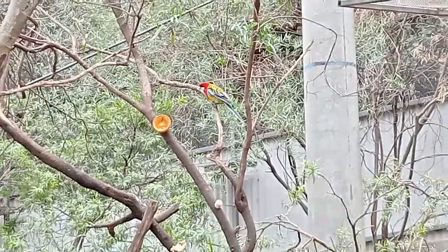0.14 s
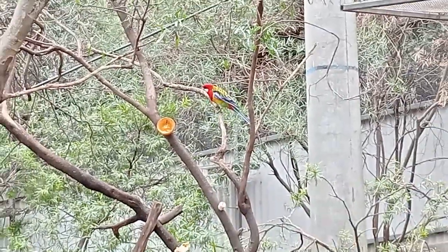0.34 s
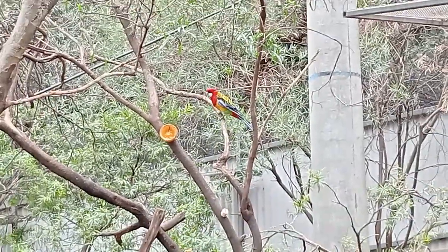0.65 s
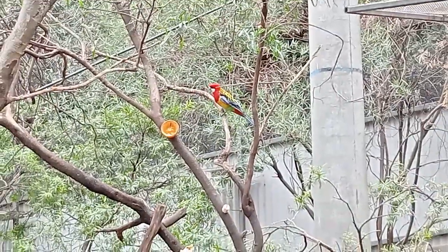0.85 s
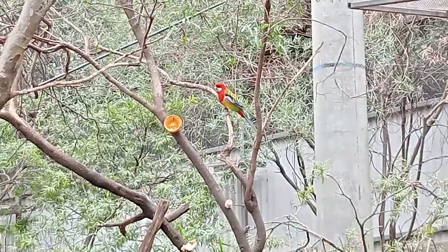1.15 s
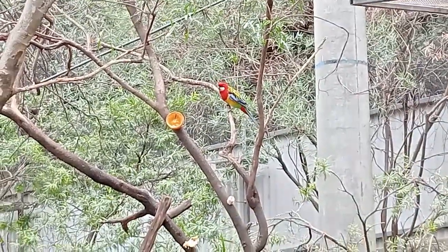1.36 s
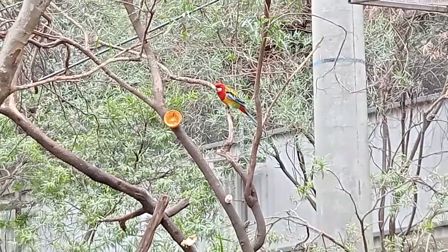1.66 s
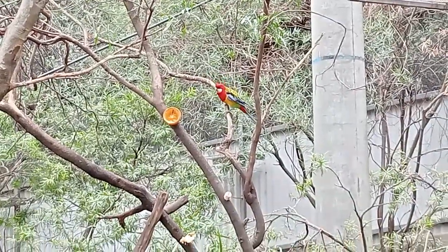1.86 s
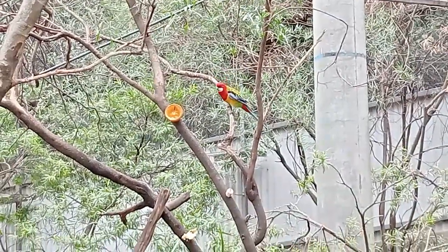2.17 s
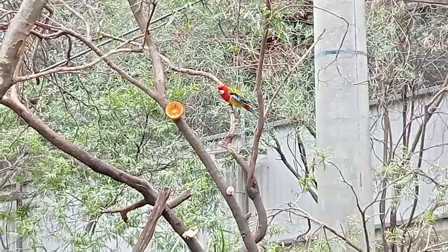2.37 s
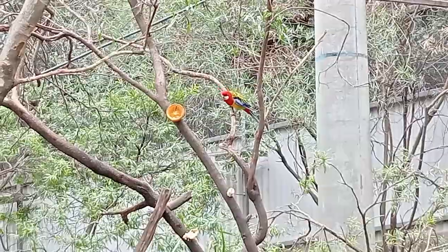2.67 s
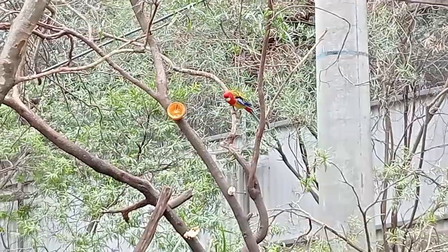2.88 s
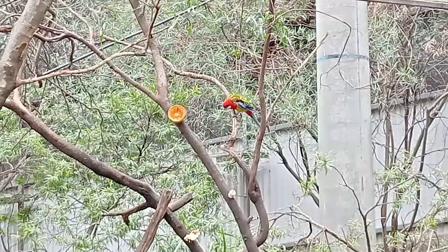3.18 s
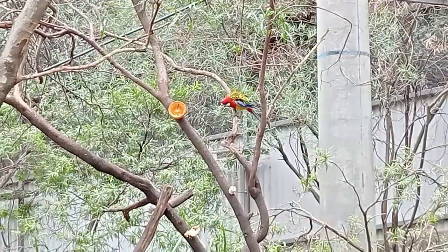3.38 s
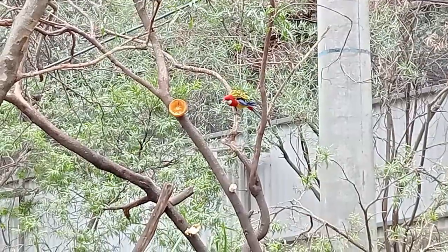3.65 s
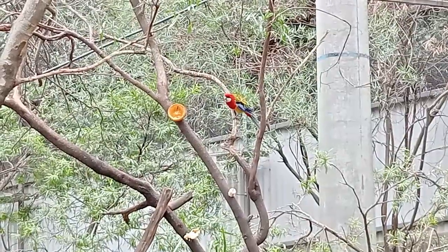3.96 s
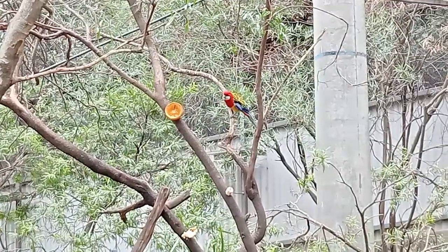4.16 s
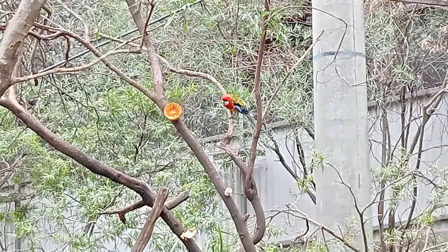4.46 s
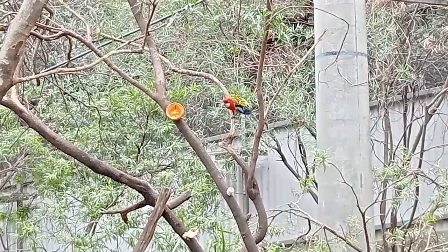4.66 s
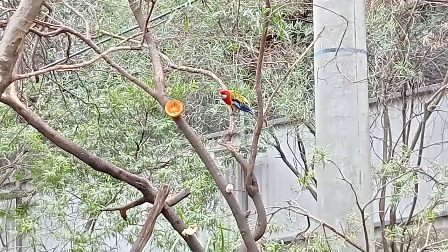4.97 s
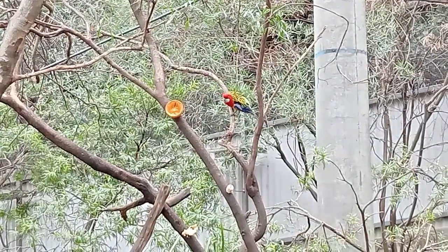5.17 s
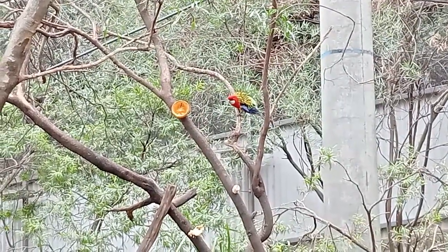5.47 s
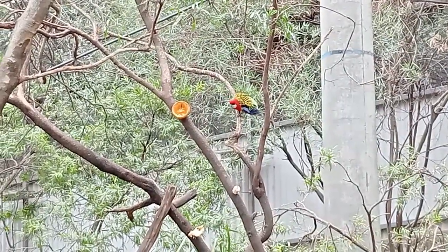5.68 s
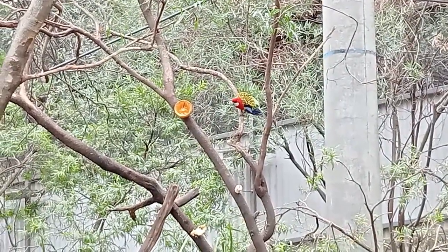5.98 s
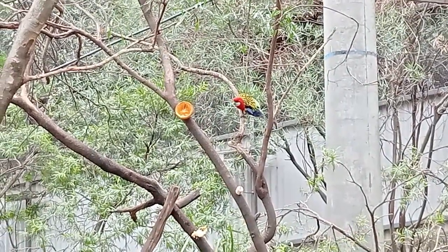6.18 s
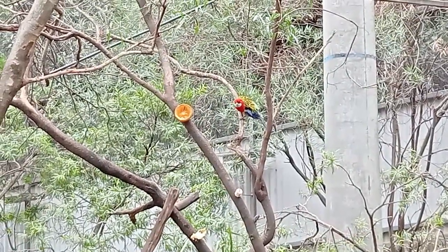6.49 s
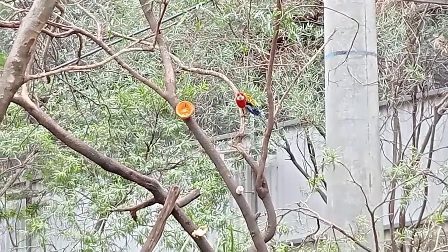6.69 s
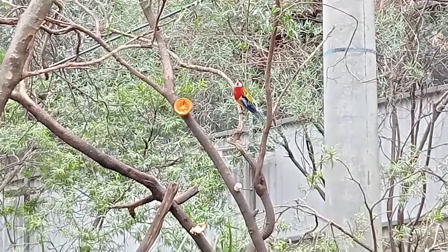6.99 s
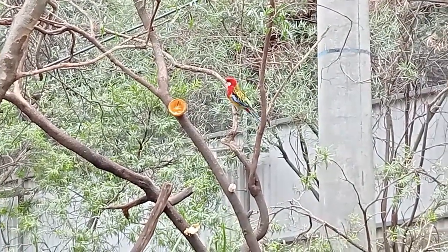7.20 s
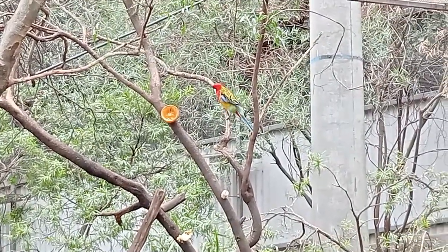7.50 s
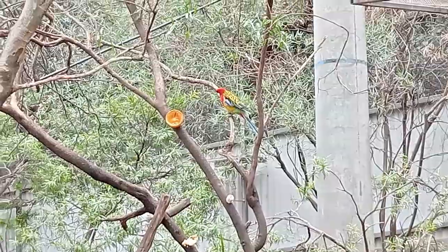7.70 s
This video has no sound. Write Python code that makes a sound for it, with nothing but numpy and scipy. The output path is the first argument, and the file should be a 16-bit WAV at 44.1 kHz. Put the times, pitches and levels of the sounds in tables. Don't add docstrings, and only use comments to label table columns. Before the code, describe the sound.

In a leafy outdoor aviary, a faint bump and the dying tail of a squawk open over soft leaf hiss and distant traffic hum. A close parrot gives smooth, hollow whoops, each climbing and briefly sagging, near 0.2, 0.7 and 1.3 seconds. It then rests: a dove yelps softly at 1.8, low fluttering coos roll from 2.1 to 2.6, and a sharp twig tick snaps at 2.15. Around 2.7 to 3.5 distant finches crowd in with thin whistles, screeches and rasps, and one loud rattling squawk at 3.0. Whoops return at 3.5 and repeat about every 0.6 seconds until 7.6. Between them come a hoot at 3.9, rolled coos at 4.1, 5.1 and 6.3, a yelp at 5.95 and another hoot at 7.55. Faint insect buzzing pulses near 1.5 and 5.3 to 6. Small ticks, rustles and chirps continue, ending on a soft high rolled coo.

```python
import sys
import numpy as np
from scipy import signal
from scipy.fft import rfft, irfft, next_fast_len
from scipy.io import wavfile
from scipy.ndimage import uniform_filter1d, map_coordinates

SR = 44100
rng = np.random.default_rng(int(sys.argv[2]) if len(sys.argv) > 2 else 0)


def decibels_to_gain(level_db):
    exponent = np.asarray(level_db, float) / 20
    return 10 ** exponent


def transcribe(u):
    v = np.clip(np.atleast_2d(u).T, -1, 1)
    q = np.round(v * 32767).astype(np.int16)
    wavfile.write(sys.argv[1], SR, q)


N = 345744
TIME = np.arange(N) / SR
FINCH_OCTAVE_DB = -20.5


def unit(x):
    return x / np.sqrt(np.mean(x ** 2) + 1e-20)


def along(points, hz):
    f, v = np.transpose(points)
    return np.interp(np.log(hz + 1), np.log(f + 1), v)


def coloured(x, response):
    m = next_fast_len(len(x) + 4096)
    spectrum = rfft(x, m) * response(np.fft.rfftfreq(m, 1 / SR))
    return irfft(spectrum, m)[:len(x)]


def wobble(n, rate):
    knots = rng.standard_normal(int(n * rate / SR) + 4)
    return map_coordinates(knots, [np.arange(n) * rate / SR])


def window(n, rise, fall):
    t = np.arange(n) / SR
    opening = np.minimum(t / rise, t[::-1] / fall)
    return np.sin(np.pi / 2 * np.clip(opening, 0, 1)) ** 2


def add(out, s, x):
    i = round(max(s, 0) * SR)
    out[i:i + len(x)] += x[:N - i]


def read(rows):
    s, *cols = np.transpose(rows)
    t = np.arange(s[0], s[-1], 1 / SR)
    curves = [uniform_filter1d(np.interp(t, s, c), size=600, mode="nearest") for c in cols]
    return s[0], curves


def tone(hz, octave_db):
    turn = 2 * np.pi * np.cumsum(hz) / SR
    return np.sqrt(2) * (np.sin(turn) + decibels_to_gain(octave_db) * np.sin(2 * turn))


def arches(notes, octave_db, rise, fall, swell, cut, bloom):
    out = np.zeros(N)
    for start, top, end in notes:
        t = np.arange(max(start[0], 0), end[0], 1 / SR)
        early = np.clip((top[0] - t) / (top[0] - start[0]), 0, 1)
        late = np.clip((t - top[0]) / (end[0] - top[0]), 0, 1)
        shut = np.clip((early - swell) / (1 - swell), 0, 1)
        hz = top[1] + (start[1] - top[1]) * early ** rise + (end[1] - top[1]) * late ** fall
        entry_db = (start[2] - top[2]) * shut ** bloom
        shoulder_db = start[3] * np.minimum(early / swell, 1)
        exit_db = (end[2] - top[2]) * late ** cut
        db = top[2] + entry_db + shoulder_db + exit_db
        edges = window(len(t), .008, .009)
        add(out, t[0], decibels_to_gain(db + 1.4 * wobble(len(t), 45.7)) * edges * tone(hz, octave_db))
    return out


def aviary(x, wall_db, tail_db, gap=0.0032):
    # delay in seconds, level in dB.
    echoes = [(.0278, -25.5), (.0341, -15), (.0393, -32), (.0567, -21), (.0631, -15), (.099, -20.5),
              (.137, -38.5)]
    # frequency in Hz, time to fade by 60 dB in seconds.
    fade_times = [(400, 0.82), (860, 0.93), (3000, 0.63), (10000, 0.74)]
    hz, t, z = signal.stft(rng.standard_normal(SR), SR, nperseg=256)
    fading = decibels_to_gain(-60 * t / along(fade_times, hz)[:, None])
    tail = signal.istft(z * fading, SR, nperseg=256)[1][:SR]
    tail *= np.clip(TIME[:SR] / gap, 0, 1)
    answer = decibels_to_gain(tail_db) * tail / np.linalg.norm(tail)
    answer[0] = 1
    for delay, db in echoes:
        answer[round(delay * SR)] += decibels_to_gain(db + wall_db)
    return signal.fftconvolve(x, answer)[:N]


def air():
    # time in seconds, level in dB.
    breeze = [(0.0, -65.5), (.7, -63), (1.15, -70), (1.53, -64), (2.7, -66.5), (3.1, -64.5), (4.4, -63.5),
              (5.2, -65.5), (5.6, -68), (5.95, -64), (6.7, -65.5), (7.1, -62), (7.84, -67)]
    # frequency in Hz, level in dB per Hz.
    hum_colour = [(15, -53), (33, -31), (50, -10), (80, -0.2), (130, -0.4), (250, 0), (420, -11.5),
                  (900, -48)]
    # frequency in Hz, level in dB per Hz.
    hiss_colour = [(240, -19), (400, -6.5), (543, -8), (833, -3.5), (985, -8), (1840, -8.5), (3290, -14),
                   (5800, -17), (13200, -24), (15400, -23)]
    s, hiss_db = np.transpose(breeze)
    hum_db = -72.5 + 0.37 * (hiss_db - hiss_db.mean())
    z = signal.stft(rng.standard_normal(N + 512), nperseg=512)[2]
    field = uniform_filter1d(rng.standard_normal(z.shape), size=6, axis=0)
    field = uniform_filter1d(field, size=10, axis=1)
    patchy = signal.istft(z * decibels_to_gain(2.2 * unit(field)), nperseg=512)[1][:N]
    hum = unit(coloured(rng.standard_normal(N), lambda f: decibels_to_gain(along(hum_colour, f))))
    hiss = unit(coloured(patchy, lambda f: decibels_to_gain(along(hiss_colour, f))))
    gust_db = 1.1 * wobble(N, 5)
    return decibels_to_gain(np.interp(TIME, s, hum_db)) * hum + decibels_to_gain(np.interp(TIME, s, hiss_db) + gust_db) * hiss


def twigs():
    # start in seconds, peak level in dB, pitch in Hz.
    ticks = [(0.0638, -78, 6120), (0.295, -46, 6960), (0.3625, -48, 9700), (1.1692, -54.5, 10240),
             (1.522, -44.5, 6081), (2.1467, -28, 5530), (4.2, -44.5, 7500), (4.77, -42, 7800),
             (4.8817, -40.5, 8700), (4.9927, -45, 8300), (5.244, -41.5, 8400), (5.3062, -58, 12300),
             (6.2835, -41, 14000), (7.8003, -50, 12900)]
    # start in seconds, length in seconds, level in dB,
    # brightness in dB per octave.
    rustles = [(0.14, 0.044, -64, 4.5), (0.216, 0.1, -63, -3), (0.54, 0.07, -61, -5.5),
               (0.812, 0.06, -70.5, 3.5), (0.942, 0.092, -62.5, -4), (1.696, 0.2, -63.5, -2),
               (1.962, 0.022, -59, -9), (4.709, 0.13, -68.5, -2.5), (2.223, 0.026, -57, -5),
               (2.345, 0.21, -61.5, -5.5), (3.872, 0.33, -65.5, -4.5), (4.869, 0.044, -64, 8),
               (5.293, 0.065, -61.5, 0), (5.988, 0.025, -63, -9), (1.255, 0.16, -66.5, -6.5),
               (2.472, 0.046, -66, -2.5), (6.327, 0.055, -66.5, 5), (6.445, 0.13, -59, -5),
               (7.454, 0.058, -59, -2.5)]
    # start in seconds, level in dB.
    bumps = [
        (.005, -59),
        (0.075, -57.5),
        (6.639, -60),
    ]
    out = np.zeros(N)
    t = TIME[:2000]
    for s, db, hz in ticks:
        band = lambda f: np.exp(-((f - hz) / 2200) ** 2)
        fade_db = -60 * t / 0.012
        add(out, s, decibels_to_gain(db - 10.0 + fade_db) * unit(coloured(rng.standard_normal(len(t)), band)))
    for s, length, db, tilt_db in rustles:
        n = int(length * SR)
        grains = rng.standard_normal(n) * decibels_to_gain(2.5 * wobble(n, 300))

        def slope(f):
            tilt = decibels_to_gain(tilt_db * np.log2(f / 4000 + .01))
            return tilt / (1 + (900 / (f + 1)) ** 4) / (1 + (f / 11000) ** 4)
        add(out, s, decibels_to_gain(db) * window(n, 0.0059, 0.54 * length) * unit(coloured(grains, slope)))
    for s, db in bumps:
        add(out, s, decibels_to_gain(db) * np.hanning(len(t)) * np.sin(2 * np.pi * 75 * t))
    return out


def bursts():
    # start in seconds, end of the long bursts in seconds, level in dB.
    buzz_phrases = [
        (1.483, 1.92, -75.5),
        (5.299, 5.88, -74),
    ]
    every_s, lead_s, long_s, short_s = .138, .09, 0.1, .053
    swell_db, last_db = 1.4, -4.5
    out = []
    for s, until, db in buzz_phrases:
        starts = np.arange(s + lead_s, until, every_s)
        out += [(s, short_s, db)]
        out += [(at, long_s, db + swell_db * k) for k, at in enumerate(starts)]
        loudest_db = out[-1][2]
        out += [(starts[-1] + k * every_s, short_s, loudest_db + k * last_db) for k in (1, 2)]
    return out


def insect(stroke_hz=175, weak=0.51):
    clicks = np.zeros(N)
    for s, length, db in bursts():
        at = np.arange(s, s + length, .5 / stroke_hz)
        strength = np.where(np.arange(len(at)) % 2, weak, 1)
        size = strength * decibels_to_gain(db + 33.0 + 0.95 * rng.standard_normal(len(at)))
        uneven = at + 1.2e-4 * rng.standard_normal(len(at))
        clicks[(uneven * SR).astype(int)] = size

    def wing(f):
        ring = 0
        for c, width, db in [(10900, 980.0, 0.36), (12220, 2300.0, -0.45)]:
            ring = ring + decibels_to_gain(db) * 1j * f * width / (c * c - f * f + 1j * f * width)
        return ring ** 2
    return coloured(clicks, wing)


def screeches():
    # start in seconds, length in seconds, centre in Hz, level in dB.
    thin_calls = [(0.136, 0.12, 6670, -71), (0.46, 0.058, 5300, -68.5), (1.4, 0.17, 7200, -66),
                  (1.427, 0.087, 3540, -66.5), (2.65, 0.29, 6950, -69.5), (2.869, 0.2, 9230, -65.5),
                  (2.949, 0.3, 3560, -56), (3.138, 0.27, 7130, -67), (3.37, 0.11, 9000, -68),
                  (3.934, 0.13, 6640, -73), (6.448, 0.13, 7600, -68), (6.565, 0.15, 7460, -70),
                  (6.767, 0.078, 5490, -67), (6.889, 0.25, 7560, -65.5), (6.99, 0.14, 5450, -74.5),
                  (7.271, 0.077, 5220, -68), (2.447, 0.031, 6940, -69)]
    # start in seconds, length in seconds, centre in Hz, level in dB.
    rasp_calls = [
        (1.794, 0.14, 4170, -71.5),
        (2.462, 0.035, 4425, -67),
        (2.896, 0.25, 6160, -61),
        (3.33, 0.12, 5250, -57.5),
        (3.42, 0.12, 5440, -64.5),
        (4.324, 0.087, 5900, -63),
    ]
    # start in
    # seconds, length in seconds, centre in Hz, level in dB.
    croak_calls = [(0, 0.19, 961, -57.5), (0, 0.074, 2200, -55), (1.79, .1, 541.6, -62.5),
                   (3.296, 0.21, 2407, -63), (3.851, 0.085, 774, -56), (4.08, 0.16, 519.5, -64),
                   (4.149, 0.36, 870, -59.5), (4.265, 0.031, 1750, -60), (4.34, 0.097, 1980, -59.5),
                   (7.22, 0.085, 1100, -61.5), (7.265, .075, 1650, -61), (7.45, 0.2, 490, -68)]
    calls = [(*row, 1153) for row in thin_calls]
    calls += [(*row, 2335) for row in rasp_calls]
    calls += [(*row, 0.548 * row[2]) for row in croak_calls]
    out = np.zeros(N)
    for s, length, centre_hz, db, width_hz in calls:
        n = int(length * SR)
        hz = centre_hz + .6 * width_hz * np.tanh(0.70307 * wobble(n, 800))
        grain_db = 4.5 * wobble(n, 55)
        add(out, s, decibels_to_gain(db + grain_db) * window(n, 0.3 * length, 0.38 * length) * tone(hz, -79.5))
    return out


def warbles():
    # time in seconds, pitch in Hz, level in dB.
    bends = [
        [(2.722, 4400, -71), (2.742, 4050, -69), (2.765, 4300, -72), (2.81, 4050, -78)],
        [(2.79, 3650, -74), (2.83, 3400, -72), (2.875, 3900, -62), (2.92, 3700, -68)],
        [(2.715, 2090, -60), (2.745, 2040, -74), (2.8, 1720, -78)],
        [(3.275, 2000, -66), (3.35, 2300, -63), (3.4, 2550, -62), (3.44, 2480, -62)],
        [(3.4, 3940, -63), (3.5, 3980, -66), (3.58, 3840, -68)],
        [(3.31, 1100, -78), (3.36, 1150, -74), (3.42, 1030, -68)],
        [(3.35, 5100, -59), (3.39, 5250, -56.5), (3.43, 5000, -64), (3.48, 5400, -54)],
        [(4.03, 2150, -69), (4.1, 2300, -72), (4.17, 2500, -64)],
        [(7.3, 1950, -61), (7.34, 1800, -68), (7.38, 1990, -67), (7.43, 1980, -74)],
        [(7.75, 2200, -70), (7.79, 2380, -82), (7.82, 2480, -65), (7.84, 2330, -55)],
    ]
    out = np.zeros(N)
    for rows in bends:
        s, (hz, db) = read(rows)
        n = len(hz)
        flutter_db = 4 * wobble(n, 90)
        shake = 1 + .022 * wobble(n, 300)
        add(out, s, decibels_to_gain(db + flutter_db) * window(n, 0.0083, 0.016) * tone(hz * shake, FINCH_OCTAVE_DB))
    return out


def whistles():
    # start in seconds, length in seconds, middle pitch in Hz, level in dB.
    level_notes = [(1.29, 0.031, 496, -65.5), (1.49, 0.011, 4150, -59), (1.503, 0.0096, 6050, -59.5),
                   (2.72, 0.036, 1050, -63.5), (1.512, .012, 4130, -58), (2.85, 0.04, 990, -62.5),
                   (2.85, 0.092, 5870, -63), (2.92, 0.086, 3195, -57.5), (2.96, 0.17, 4656, -53.5),
                   (2.97, 0.1, 9320, -69), (7.78, 0.064, 4860, -72), (4.72, 0.061, 417, -69.5),
                   (3.45, 0.031, 7450, -65), (3.67, 0.043, 8800, -74), (3.99, 0.12, 4480, -64),
                   (4.29, 0.033, 1380, -66), (4.41, 0.061, 4350, -71), (4.8, 0.097, 2850, -75.5),
                   (5.09, 0.029, 1050, -60.5), (5.1, 0.086, 6720, -72.5), (5.17, 0.038, 4840, -72),
                   (4.1, 0.095, 2014, -67), (5.43, 0.046, 3160, -71.5), (5.61, .07, 3120, -77),
                   (6.49, 0.04, 3190, -70), (6.865, 0.041, 7090, -71), (3.0, 0.2, 3830, -60),
                   (3.315, .015, 1400, -65), (7.69, 0.05, 7950, -71.5)]
    # start in seconds, length in seconds, middle pitch in Hz, level in dB.
    sighs = [(0, 0.041, 2910, -58), (.46, 0.047, 2145, -62.5), (1.355, 0.077, 4830, -65.5),
             (1.42, 0.11, 4800, -77), (1.5, .1, 3410, -72), (1.41, 0.11, 3450, -66),
             (1.72, 0.048, 1876, -64), (2.93, 0.042, 830, -69), (2.15, 0.012, 4220, -50),
             (2.44, 0.081, 2273, -64), (2.86, .11, 1840, -65.5), (1.24, 0.022, 5180, -70.5),
             (3.32, 0.082, 4090, -56), (4.36, 0.044, 5190, -57), (5.3, .04, 5900, -74),
             (5.91, 0.035, 3800, -74), (6.85, 0.048, 3720, -74)]
    # start in seconds, length in seconds, first pitch in Hz, last pitch in Hz,
    # level in dB.
    chirps = [(.3, 0.17, 1620, 2000, -67), (2.12, 0.043, 6200, 5710, -53.5),
              (2.142, 0.0115, 1820, 2400, -60), (1.72, 0.032, 2400, 1400, -61),
              (2.2, .035, 1300, 2400, -61), (2.251, 0.013, 1520, 1400, -70), (2.48, 0.024, 4340, 5750, -62),
              (1.6, 0.013, 3000, 4200, -59), (3.533, 0.19, 2720, 3000, -65.5),
              (3.53, 0.17, 5500, 5870, -61.5), (3.821, .217, 3900, 4180, -67.5),
              (1.55, 0.083, 420, 560, -70.5), (.5, .06, 1100, 1340, -68), (0.88, 0.078, 1424, 1390, -72.5),
              (4.342, 0.057, 1840, 2250, -52.5), (5.15, 0.088, 2180, 1620, -67),
              (5.286, 0.05, 5200, 4400, -68.5), (5.295, 0.079, 2023, 1765, -67),
              (5.862, 0.034, 5690, 3700, -66.5), (6.471, 0.026, 2000, 1664, -60.5),
              (6.797, 0.031, 6150, 4420, -63), (7.278, 0.038, 1700, 1400, -63),
              (7.305, .03, 1600, 1400, -64), (1.777, 0.037, 5940, 6100, -59),
              (3.07, 0.034, 5700, 5780, -57), (3.087, 0.032, 5700, 5330, -73),
              (6.764, 0.015, 2100, 1040, -59), (6.784, 0.022, 1100, 1840, -58)]
    glides = []
    for rows, bend in [(level_notes, 0.02), (sighs, -.045)]:
        for s, length, hz, db in rows:
            glides.append((s, length, hz * (1 - bend / 2), hz * (1 + bend / 2), db))
    far, near = np.zeros((2, N))
    for s, length, first_hz, last_hz, db in glides + chirps:
        n = int(length * SR)
        shake = 1 + 0.011 * wobble(n, 300) + .008 * wobble(n, 45)
        hz = np.linspace(first_hz, last_hz, n) * shake
        level = decibels_to_gain(db + 2.42 * wobble(n, 90.977)) * window(n, 0.053 * length, 0.1 * length)
        bird = near if length < .0455 else far
        add(bird, s, level * tone(hz, FINCH_OCTAVE_DB))
    return far, near


def squawk(rattle_hz=190):
    # time in seconds, pitch in Hz, level in dB.
    upper_voice = [
        (2.945, 1610, -53),
        (2.99, 1800, -48),
        (3.03, 2250, -45),
        (3.056, 2760, -44.5),
        (3.124, 2800, -45),
        (3.135, 2350, -42.5),
        (3.158, 1458, -47),
    ]
    # time in seconds, pitch in Hz, level in dB.
    lower_voice = [
        (2.95, 1600, -55),
        (2.99, 1660, -48),
        (3.03, 1870, -48),
        (3.06, 2150, -52),
        (3.1, 2450, -58),
    ]
    out = np.zeros(N)
    for voice in (upper_voice, lower_voice):
        s, (hz, db) = read(voice)
        n = len(hz)
        rattle = 1 + 0.5 * np.sin(2 * np.pi * rattle_hz * TIME[:n] + 0.54 * wobble(n, 65))
        shake = 1 + .028 * wobble(n, 250)
        level = decibels_to_gain(db + 1.75 * wobble(n, 66.6)) * window(n, 0.015, 0.0025) * rattle
        add(out, s, level * tone(hz * shake, -21.5))
    return out


def roll(s, trill, hz, db, settled_db):
    flick_hz, hold_s = 198.7, 0.06
    calm = s + trill
    return [(s, hz, db - 9.5, flick_hz * 0.685),
            (s + 0.039, hz, db, flick_hz),
            (calm - 0.077, hz, settled_db - 4.5, flick_hz * 0.92),
            (calm, hz, settled_db, flick_hz * 0.11),
            (calm + hold_s, hz * .98, settled_db - 4.0, 0),
            (calm + hold_s + .025, hz * .95, settled_db - 10, 0),
            (calm + .26, hz * .7, settled_db - 21.5, 0)]


def rolls(trill_hz=26, held_db=-10):
    # start in seconds, trill length in seconds, held pitch in Hz, trill level in dB,
    # settled level in dB.
    rolled_coos = [
        (1.84, 0.17, 584, -66, -61),
        (2.085, 0.36, 564.5, -47, -50),
        (2.4, 0.13, 591.4, -52, -53.5),
        (4.06, 0.39, 674, -57, -47),
        (5.08, .24, 583.5, -50.5, -51),
        (6.25, 0.345, 574.8, -47, -47.5),
        (7.72, 0.26, 639, -52.5, -56),
    ]
    out = np.zeros(N)
    for row in rolled_coos:
        s, (hz, db, flick_hz) = read(roll(*row))
        n = len(hz)
        beat = np.cumsum(trill_hz * (1 + 0.216 * wobble(n, 25.8))) / SR % 1
        depth = np.clip(flick_hz / 150, 0, 1)
        flutter_db = 4 * np.cos(2 * np.pi * beat) + 2.2 * wobble(n, 80)
        held_hz = hz * (1 + 0.0219 * depth * wobble(n, 64.8))
        held = decibels_to_gain(depth * (held_db + flutter_db)) * tone(held_hz, -42.0)
        bleat = depth * np.sin(np.pi * beat) ** 2.5 * decibels_to_gain(2.2 * wobble(n, 110))
        upper_hz = hz + flick_hz * (0.28 + 0.68 * beat + 0.1234 * wobble(n, 40.14))
        upper = tone(upper_hz, -45)
        add(out, s, decibels_to_gain(db) * window(n, 0.0072, 0.032) * (held + 1.54 * bleat * upper))
    return out


def phrases(rows, climb, drop, entry_db, exit_db):
    return [[(s - up, hz - climb * up, db + entry_db, 0), (s, hz, db), (s + down, hz - drop * down, db + exit_db)]
            for s, up, down, hz, db in rows]


def coos():
    # top of the arch in seconds, rise in seconds, fall in seconds, top pitch in Hz,
    # level in dB.
    low_dove = [
        (1.665, 0.04, 0.018, 591, -48.5),
        (2.075, 0.021, 0.01, 608, -52.5),
        (3.03, 0.083, 0.069, 577, -48),
        (3.685, .04, 0.05, 573, -53),
        (4.92, 0.081, 0.057, 603.5, -51),
        (7.2, 0.097, 0.091, 585, -47),
        (7.31, 0.024, 0.062, 572, -53),
        (7.745, 0.096, 0.047, 606, -50),
    ]
    # top in seconds, rise and fall in seconds, pitch in Hz, level in dB.
    yelping_dove = [
        (1.77, 0.084, 0.034, 753, -38.5),
        (5.95, .12, 0.059, 742, -39),
    ]
    # top in seconds, rise and fall in seconds, pitch in Hz, level in dB.
    hooting_dove = [
        (3.925, 0.041, 0.0423, 722, -35.5),
        (7.56, .07, 0.072, 726.3, -39.5),
    ]
    notes = phrases(low_dove, climb=1298, drop=1318, entry_db=-17, exit_db=-14.5)
    notes += phrases(yelping_dove, climb=1759, drop=4802, entry_db=-14, exit_db=-22.5)
    notes += phrases(hooting_dove, climb=506, drop=955, entry_db=-11.5, exit_db=-8.5)
    return arches(notes, -37.5, rise=1.88, fall=2.18, swell=0.045, cut=1.4, bloom=0.86)


def parrot_whoops():
    # top of the arch in seconds, fall in seconds, top pitch in Hz, level in dB,
    # level change by the end in dB.
    tops = [(.16, 0.079, 865, -33, 1.5), (.74, 0.066, 862.4, -33.5, 1.5), (1.3, 0.06, 865, -33.5, -3),
            (3.54, 0.061, 830, -35, -2.5), (4.11, 0.057, 833, -32, -3), (4.68, 0.065, 856.7, -32.5, -2.5),
            (5.23, 0.08, 854.5, -33, -1), (5.81, 0.071, 863.3, -33.5, 2), (6.385, 0.076, 867.4, -33.5, -1),
            (6.96, 0.071, 865.6, -33.5, 1), (7.57, 0.054, 852, -33.5, 2.5)]
    # climb in seconds, level early in the climb in dB beside the top.
    openings = [(.165, -0.5), (0.17, 0.5), (0.14, -0.5), (0.16, -5.5), (.165, -2), (0.18, -1), (.168, -0.5),
                (.16, 1), (.165, 0.5), (.165, 2), (0.17, 0)]
    from_hz, entry_db, sag_hz = 551, -37.5, 88
    notes = []
    for (s, down, hz, db, fade_db), (up, shoulder_db) in zip(tops, openings):
        start = (s - up, from_hz, db + entry_db, shoulder_db)
        end = (s + down, hz - sag_hz, db + fade_db)
        notes.append([start, (s, hz, db), end])
    return arches(notes, -50.5, rise=2.1, fall=4.47, swell=0.51, cut=2.8, bloom=0.91)


def scene():
    small = aviary(twigs() + insect(), wall_db=-9.5, tail_db=-4.5)
    far, near = whistles()
    finches = aviary(far + warbles() + screeches(), wall_db=-9, tail_db=0.5)
    finches += aviary(decibels_to_gain(2.0) * near, wall_db=-13.0, tail_db=-7.5)
    loud = aviary(squawk(), wall_db=-4, tail_db=-4)
    earlier_end = loud[round(3.135 * SR):round(4.1 * SR)]
    add(finches, 0, decibels_to_gain(-1.5) * earlier_end)
    doves = aviary(coos(), wall_db=-4.5, tail_db=-19, gap=0.025)
    doves += aviary(rolls(), wall_db=3.0, tail_db=-6.5)
    parrot = aviary(parrot_whoops(), wall_db=0.5, tail_db=-20, gap=0.06)
    return (parrot + doves + finches + loud + small + air())[None]


def top_cut(x):
    return signal.sosfilt(signal.butter(12, 15570, fs=SR, output="sos"), x)


def record(dry):
    thin = coloured(dry[0], lambda f: 1 / (1 + (38 / (f + 1)) ** 4))[None]
    return top_cut(thin)


dry = scene()
out = record(dry)
transcribe(out)
```